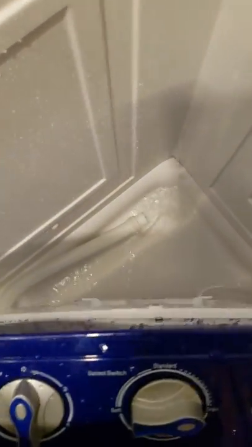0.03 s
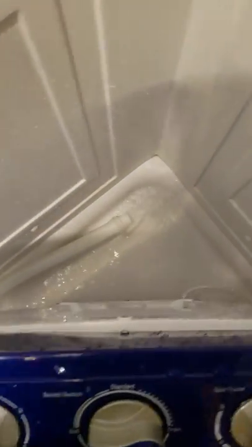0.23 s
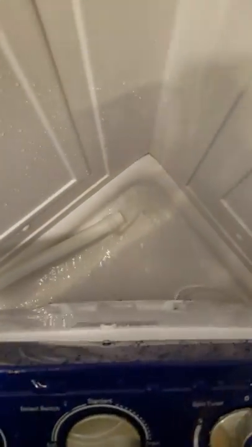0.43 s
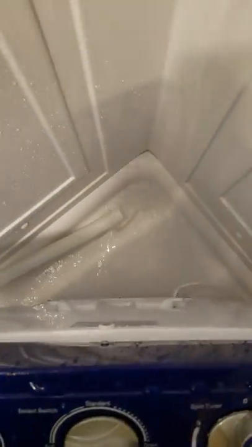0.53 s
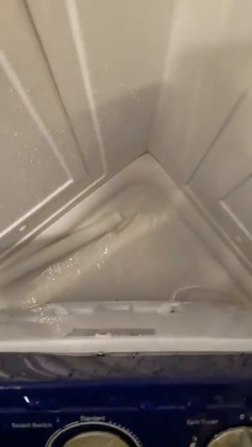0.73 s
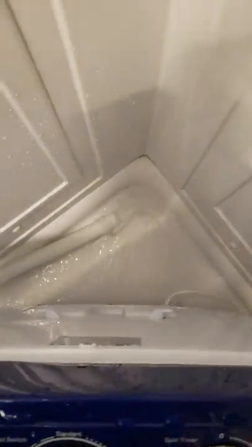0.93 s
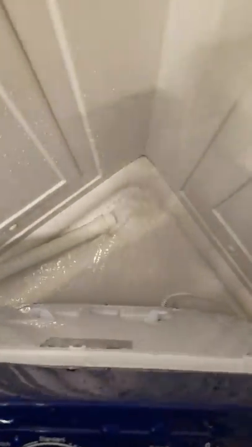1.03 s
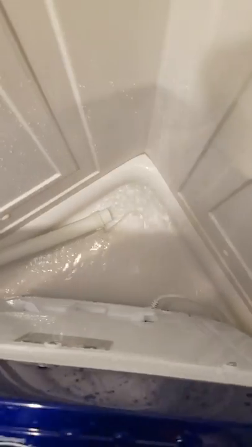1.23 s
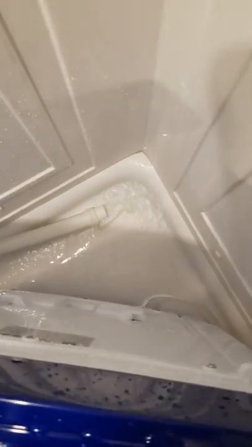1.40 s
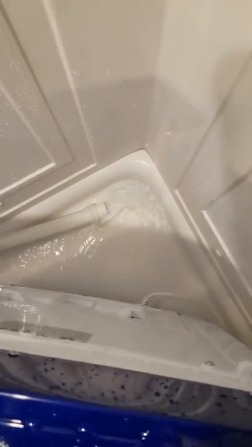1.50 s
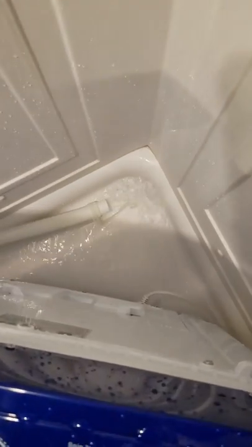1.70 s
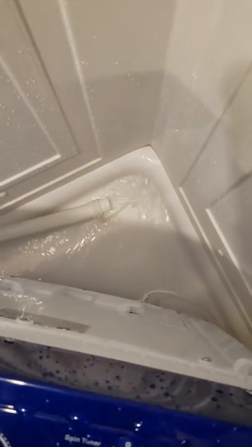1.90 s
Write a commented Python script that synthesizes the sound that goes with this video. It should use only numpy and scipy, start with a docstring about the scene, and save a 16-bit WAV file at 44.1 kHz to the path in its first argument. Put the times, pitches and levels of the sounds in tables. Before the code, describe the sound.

Water trickling unevenly from a drain hose patters and plinks in a small shower stall.

```python
"""Drain hose dribbling into a shower stall

Water falls on a plastic shower pan in a small hard-walled stall, two microphones above it.
Drops tick and slap on the wet pan, trapped bubbles ring and rise in pitch, and a fine patter fills
the gaps. The pan drums softly under the stream; a mains hum and a low rumble lie beneath."""
import sys
import numpy as np
from scipy import signal
from scipy.fft import rfft, irfft, next_fast_len
from scipy.io import wavfile

SR = 44100
rng = np.random.default_rng(int(sys.argv[2]) if len(sys.argv) > 2 else 0)


def dump_mix(stems):
    """Bounce the given channels to the path in sys.argv[1] as a 16-bit WAV at rate SR."""
    frames = np.atleast_2d(stems).T  # one column per channel
    limited = np.clip(frames, -1, 1)  # hard clip at full scale
    pcm = np.round(limited * 32767).astype(np.int16)
    wavfile.write(sys.argv[1], SR, pcm)


N = 85995

# spectrum of fine spray: frequency_hz, gain_db
SPRAY_SPECTRUM = [(2000, 7.5), (6000, -29), (9000, 5.5), (12000, 9.5), (16000, 13.5)]


def amp(db):
    """Decibels as a gain."""
    return 10 ** (np.asarray(db) / 20)


def unit(x):
    """x scaled to rms 1."""
    return x / np.sqrt(np.mean(x ** 2) + 1e-20)


def along(points, hz):
    """A (frequency_hz, value) curve read at hz, on a log axis."""
    f, value = np.transpose(points)
    return np.interp(np.log(hz + 1), np.log(f + 1), value)


def level(rows):
    """A (time_s, level_db) curve as a gain per sample."""
    return amp(np.interp(np.arange(N) / SR, *np.transpose(rows)))


def clock():
    """The time axis of one drop, in seconds."""
    return np.arange(SR // 8) / SR


def add(out, start_s, x):
    """Mix x into out from start_s."""
    i = int(np.clip(round(start_s * SR), 0, N - 1))
    out[..., i:i + x.shape[-1]] += x[..., :N - i]


def coloured(x, spectrum):
    """x through a minimum-phase filter with the given (frequency_hz, gain_db) curve."""
    size = 2048
    gain = amp(along(spectrum, np.fft.rfftfreq(size, 1 / SR)))
    cepstrum = irfft(np.log(gain))
    cepstrum[1:size // 2] *= 2
    cepstrum[size // 2 + 1:] = 0
    response = irfft(np.exp(rfft(cepstrum)))
    return signal.fftconvolve(x, response)[:len(x)]


def stall(x):
    """x from a random spot in the stall to both microphones: straight path, near walls, short tail."""
    # reverberation of the stall: frequency_hz, t60_s
    decay = [(200, .22), (1000, .17), (3000, 0.16), (7000, 0.13), (16000, 0.11)]
    # likeness of the two sides, high in the bass: frequency_hz, correlation
    likeness = [(100, 0.8), (250, 0.84), (500, 0.53), (1000, 0.0071), (16000, 0)]
    direct_db, walls_db, walls_t60_s = -6.5, -5, 0.029  # levels relative to the tail
    hz, t, noise = signal.stft(rng.standard_normal((2, SR // 4)), SR, nperseg=256)
    tail = signal.istft(noise * amp(-60 * t / along(decay, hz)[:, None]), SR, nperseg=256)[1]
    t = np.arange(tail.shape[1]) / SR
    walls = rng.standard_normal(tail.shape) ** 3 * amp(-60 * t / walls_t60_s)  # cubed: spiky echoes
    walls /= np.linalg.norm(walls, axis=1, keepdims=True)
    response = tail / np.linalg.norm(tail[0]) + amp(walls_db) * walls
    response[[0, 1], rng.integers(0, 12, 2)] += amp(direct_db)
    sides = rfft(response)
    correlation = np.clip(along(likeness, np.fft.rfftfreq(len(t), 1 / SR)), -1, 1)
    blend = np.arcsin(correlation) / 2
    response = irfft(np.cos(blend) * sides + np.sin(blend) * sides[::-1])[:, :SR // 5]
    return signal.fftconvolve(x[None], response, axes=1)


def in_stall(drop):
    """One drop in the stall, each side scaled to the energy of 2.5 ms at rms 1."""
    pair = stall(drop)
    return pair / np.sqrt(np.sum(pair ** 2, axis=1, keepdims=True) / (0.0025 * SR))


def scattered(x):
    """A stream whose landing spot keeps shifting in the stall, at rms 1."""
    out, block = np.zeros((2, N)), 2048
    for i in range(0, N, block):
        add(out, i / SR, stall(x[i:i + block]))
    return unit(out)


def hum_and_rumble():
    """A mains hum in a low rumble, nearly the same on both sides."""
    # spectrum of the rumble: frequency_hz, gain_db
    rumble_spectrum = [(15, -81), (30, 5.5), (48, -0.5), (78, 2.5), (105, -6.5), (170, -16), (260, -27),
                       (600, -38), (2000, -52), (16000, -32.5)]
    hum_hz, hum_db, rumble_db = 57.4, -61, -54
    mid, side = (unit(coloured(rng.standard_normal(N), rumble_spectrum)) for _ in range(2))
    hum = np.sqrt(2) * np.sin(2 * np.pi * (hum_hz * np.arange(N) / SR + rng.random()))
    width = amp(-18) * np.array([side, -side])
    return amp(hum_db) * hum + amp(rumble_db) * (mid + width)


def impacts(per_s, spread_db):
    """Droplets land as impulses at random times, many small and a few large."""
    when, size, polarity = rng.random((int(per_s * N / SR), 3)).T
    strengths = amp(-spread_db * np.log(np.maximum(size, .03))) * np.sign(polarity - .5)
    return np.bincount((when * N).astype(int), strengths, N)


def pan_ring(force):
    """The plastic pan answers a force with its low, damped modes."""
    # modes of the pan: pitch_hz, width_hz, level_db
    modes = [(70.5, 46, 0), (168.5, 37.5, -1), (327, 66, -2), (428.5, 42, 0), (472.3, 50, -0.5),
             (684, 29.4, -3.5), (874, 97, -15)]
    size = next_fast_len(len(force) + SR // 4)
    f = np.fft.rfftfreq(size, 1 / SR)
    body = sum((-1) ** k * amp(db) * 1j * f * width / (hz * hz - f * f + 1j * f * width)
               for k, (hz, width, db) in enumerate(modes))
    return irfft(rfft(force, size) * body, size)[:len(force)]


def bubble(hz, cycles, attack_s):
    """Trapped air rings, dying 60 dB over `cycles` and rising in pitch as it nears the surface."""
    t, rise = clock(), 0.093
    age = t * hz / cycles
    pitch = hz * (1 + rise * np.minimum(age, 1))
    envelope = amp(-60 * age) * (1 - np.exp(-t / attack_s))
    return np.sin(2 * np.pi * np.cumsum(pitch) / SR) * envelope


def fizz():
    """A swarm of tiny bubbles ringing at random times and pitches."""
    per_s, centre_hz, spread_octaves = 330, 3906, 1.386
    out = np.zeros(N)
    for when, pitch, faintness in rng.random((int(per_s * N / SR), 3)):
        hz = centre_hz * 2 ** (spread_octaves * (2 * pitch - 1))
        add(out, when * N / SR, amp(-14 * faintness) * bubble(hz, cycles=54, attack_s=0.00024))
    return out


def stream():
    """Patter, mist and fizz follow the flow from the hose; the pan drums under them."""
    # flow as the hose spurts and starves: time_s, level_db
    flow = [(0, -43), (.12, -53), (.155, -59), (.3, -43.5), (.375, -58.5), (.4, -69), (.43, -51),
            (.53, -47), (.59, -55), (.72, -44), (.77, -51.5), (.89, -55.5), (.93, -54.5), (1.02, -53),
            (1.07, -50), (1.21, -49.5), (1.33, -50), (1.395, -54), (1.46, -48.5), (1.54, -55), (1.6, -55.5),
            (1.75, -48), (1.87, -52), (1.95, -61)]
    # swell of the pan's drumming: time_s, level_db
    drumming = [(0, -53), (.1, -71.5), (.21, -59.5), (.36, -78), (.44, -65), (.53, -62.5), (.6, -67),
                (.69, -59.5), (.87, -64), (.98, -77.5), (1.09, -54.5), (1.29, -57.5), (1.35, -64),
                (1.5, -58), (1.59, -55), (1.73, -67), (1.95, -67.5)]
    # spectrum of droplets on the wet pan: frequency_hz, gain_db
    patter_spectrum = [(300, -29), (700, -6.5), (1100, 4), (1900, 3), (3000, 4.5), (4700, 2), (6500, -3),
                       (8000, -20), (11000, -5.5), (16000, -2.5)]
    patter = scattered(coloured(impacts(per_s=500, spread_db=5), patter_spectrum))
    drum = scattered(pan_ring(impacts(per_s=300, spread_db=3)))
    mist = scattered(coloured(impacts(per_s=1500, spread_db=1.5), SPRAY_SPECTRUM))
    water = amp(-1) * patter + amp(-15) * mist + amp(-4.5) * scattered(fizz())
    return level(flow) * water + amp(1) * level(drumming) * drum


def gurgles():
    """Larger bubbles plink in the puddle at the hose mouth; each splits off two weaker daughters."""
    # larger bubbles: start_s, level_db, pitch_hz, life_cycles
    plinks = [(.008, -45, 1750, 28), (0.026, -39, 1160, 45), (0.048, -40.5, 940, 22), (.097, -43, 2190, 32),
              (.147, -38.5, 2140, 47), (.15, -40, 4520, 124), (.362, -42, 830, 3), (.415, -42, 1760, 38),
              (0.418, -42.5, 2595, 80), (.477, -36.5, 1050, 43), (0.479, -34.5, 1630, 69),
              (0.5, -40.5, 1962, 79), (0.651, -35, 1830, 28), (0.684, -36.5, 1700, 34),
              (0.784, -40.5, 997, 35), (0.807, -44, 2300, 60), (.833, -37, 1658, 47),
              (0.847, -40, 2970, 51), (0.941, -46, 1800, 70), (1.058, -36, 2015, 39),
              (1.083, -41, 1880, 34), (1.155, -37, 1920, 27), (1.257, -37.5, 1880, 39),
              (1.277, -34, 980, 40), (1.322, -41, 2850, 63), (1.525, -42.5, 870, 31),
              (1.547, -41.5, 900, 23), (1.58, -40.5, 1540, 7), (1.6, -40.5, 950, 26),
              (1.623, -29, 1124, 66), (1.668, -49, 797, 30), (1.67, -45, 1430, 48), (1.71, -43.5, 2160, 60),
              (1.718, -47, 480, 46), (1.746, -40, 1740, 13), (1.894, -40, 2950, 23)]
    parent_db, daughter_db, attack_s = 1.5, -13.5, 0.00054
    split_within_s, scatter_octaves = .025, 0.35
    out = np.zeros((2, N))
    for start_s, db, hz, cycles in plinks:
        add(out, start_s, amp(db + parent_db) * in_stall(bubble(hz, cycles, attack_s)))
        for delay, pitch in rng.random((2, 2)):
            daughter_hz = hz * 2 ** (scatter_octaves * (2 * pitch - .5))
            daughter = bubble(daughter_hz, cycles / 2, attack_s)
            add(out, start_s + split_within_s * delay, amp(db + daughter_db) * in_stall(daughter))
    return out


def ticks():
    """Sharp drops, each briefly ringing a tiny bubble."""
    # sharp drops: start_s, level_db, pitch_hz, life_cycles
    drops = [(.047, -42.5, 6750, 55), (.2228, -16.5, 6470, 28), (.2742, -31.5, 4330, 38),
             (.277, -37.5, 10400, 18), (.2887, -33, 6200, 48), (.3015, -22, 3680, 12),
             (.3445, -34, 6000, 23), (.372, -33.5, 4800, 40), (.683, -27.5, 4470, 43),
             (.686, -27, 5280, 60), (.692, -27, 4640, 40), (.7235, -32, 5800, 40),
             (0.7841, -32.5, 6000, 14), (.86, -32, 12000, 46), (.876, -40.5, 5200, 60),
             (.955, -42, 6100, 40), (1.1035, -30.5, 5100, 98), (1.125, -34.5, 5160, 124),
             (1.188, -36, 6200, 36), (1.374, -40, 6200, 26), (1.4066, -23.5, 5000, 11),
             (1.5045, -38, 6200, 16), (1.564, -32, 5100, 9.5), (1.595, -34, 6600, 12),
             (1.662, -33, 5740, 12), (1.6975, -41, 6740, 30), (1.768, -36.5, 5360, 63.5),
             (1.7993, -29.5, 4780, 11), (1.8155, -29, 4520, 36), (1.8565, -33, 4050, 43)]
    out = np.zeros((2, N))
    for start_s, db, hz, cycles in drops:
        add(out, start_s, amp(db - 5.5) * in_stall(bubble(hz, cycles, attack_s=0.0001)))
    return out


def droplet_burst(t60_s):
    """A blob breaks into droplets: grainy noise that dies away."""
    t, graininess = clock(), 3.14
    grains = rng.standard_normal(len(t)) * rng.random(len(t)) ** graininess
    return grains * amp(-60 * t / t60_s)


def slaps():
    """Each blob smacks the wet floor, throws spray and thuds the pan."""
    # falling blobs: start_s, smack_db, spray_db, thud_db, breakup_s
    blobs = [(.143, -34.5, -54, -51, 0.11), (.198, -38, -56, -43, 0.041), (0.224, -34, -27.5, -49, 0.026),
             (0.299, -38.5, -38, -41.5, 0.012), (0.346, -34, -39, -66, 0.096),
             (0.412, -42, -39, -57, 0.004), (0.526, -41.5, -43, -49.5, .05), (.648, -38, -62, -41, 0.13),
             (.682, -29, -33, -45.5, 0.09), (0.873, -41, -56, -48.5, 0.086),
             (1.047, -34.5, -38.5, -54, 0.038), (1.105, -42, -49, -66, 0.011),
             (1.204, -40, -32.5, -72, 0.18), (1.407, -22, -28, -37, 0.01), (1.593, -38, -30.5, -47, 0.025),
             (1.619, -59.5, -40, -60, 0.032), (1.661, -38.5, -37, -48, 0.06), (1.74, -39, -55, -47, 0.044),
             (1.886, -40.5, -43.5, -55, 0.047)]
    # spectrum of a wet smack: frequency_hz, gain_db
    smack_spectrum = [(150, -6), (500, -21), (1100, 4.5), (2500, 0), (4800, 4), (7000, -5), (9000, -36),
                      (16000, -25)]
    out = np.zeros((2, N))
    for start_s, smack_db, spray_db, thud_db, breakup_s in blobs:
        smack = in_stall(coloured(droplet_burst(breakup_s), smack_spectrum))
        spray = in_stall(coloured(droplet_burst(breakup_s), SPRAY_SPECTRUM))
        thud = in_stall(pan_ring(droplet_burst(t60_s=0.018)))
        add(out, start_s, amp(smack_db) * smack + amp(spray_db) * spray + amp(thud_db) * thud)
    return out


def scene():
    """All the water in the stall, over the hum and rumble."""
    return ticks() + gurgles() + slaps() + hum_and_rumble() + stream()


def record(dry):
    """Two microphones above the pan, each with its own colour, cut off in the top treble."""
    # response of the left microphone: frequency_hz, gain_db
    left_mic = [(100, -1.5), (300, 7.5), (480, 7), (700, 5), (1200, 1), (2500, 3), (4000, 2.5), (5500, 5),
                (6400, 12), (7700, 12.5), (9500, 16), (12000, 1.5), (16000, -11.5)]
    # response of the right microphone: frequency_hz, gain_db
    right_mic = [(100, -5), (300, 0), (480, -4), (700, 4.5), (1200, -1), (2500, -1), (4000, -3),
                 (5500, -3.5), (6400, -8.5), (7700, 0.5), (9500, 4.5), (12000, 4.5), (16000, 2)]
    top_hz = 16100
    pair = np.array([coloured(dry[0], left_mic), coloured(dry[1], right_mic)])
    size = next_fast_len(N + SR // 4)
    passband = np.fft.rfftfreq(size, 1 / SR) < top_hz
    return irfft(rfft(pair, size) * passband, size)[:, :N]


dry = scene()
out = record(dry)
dump_mix(out)
```